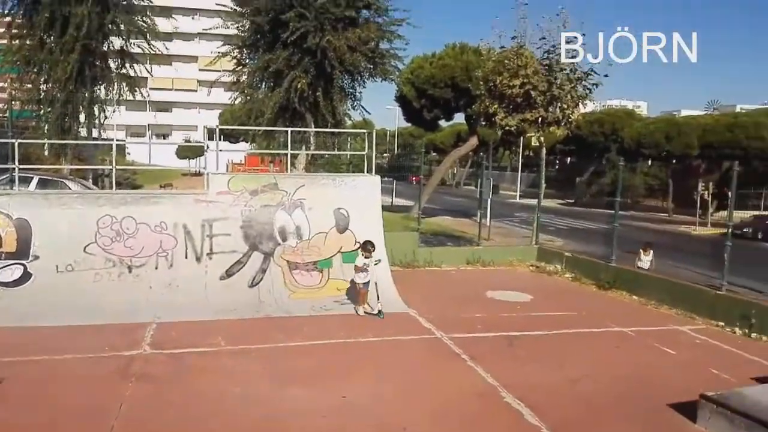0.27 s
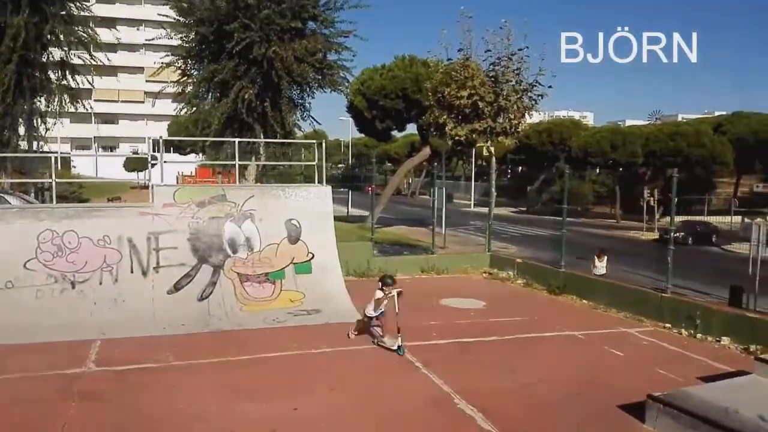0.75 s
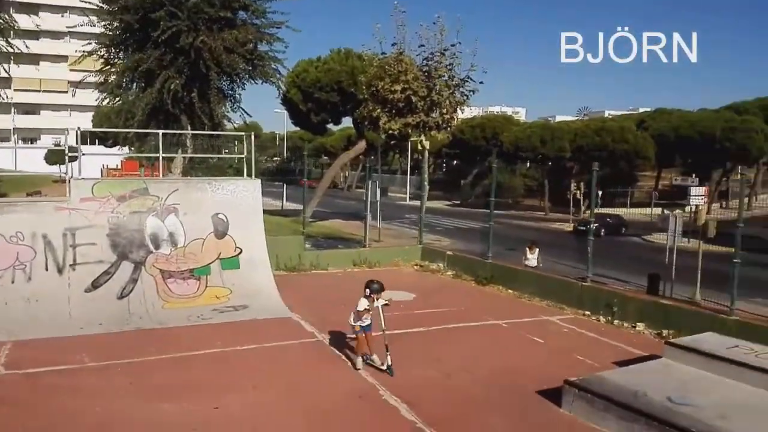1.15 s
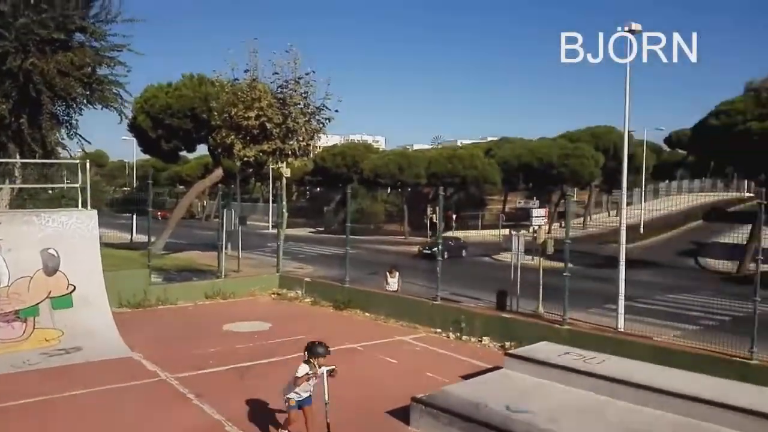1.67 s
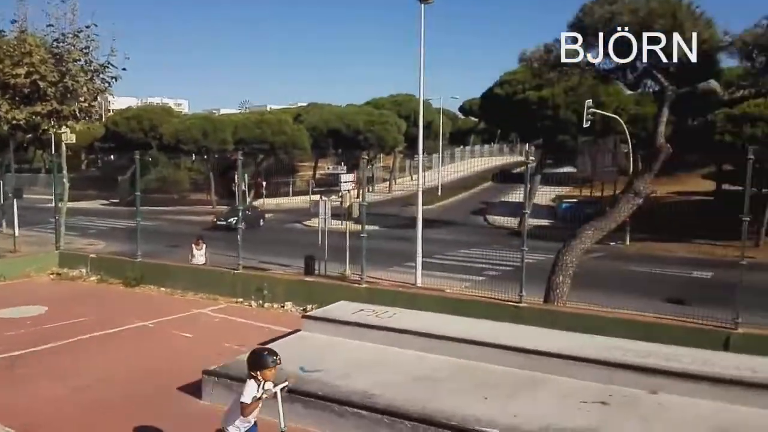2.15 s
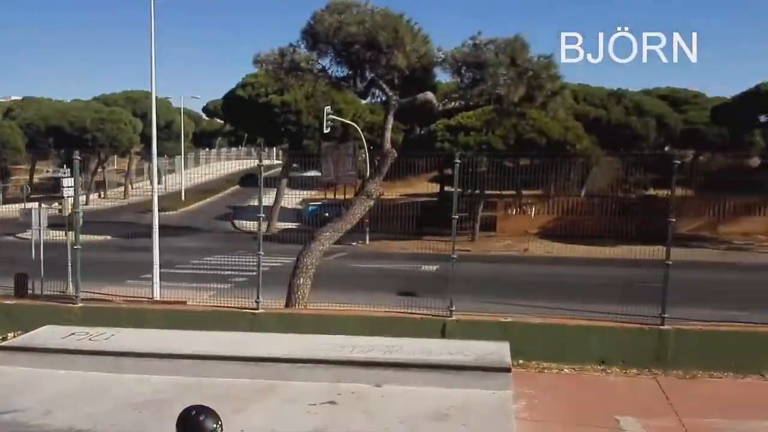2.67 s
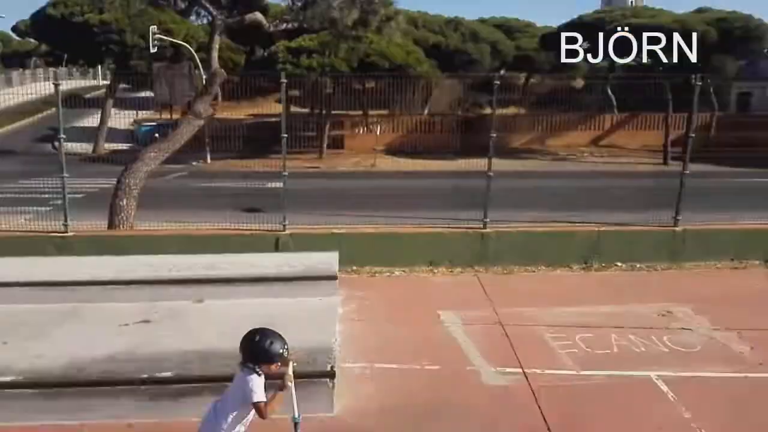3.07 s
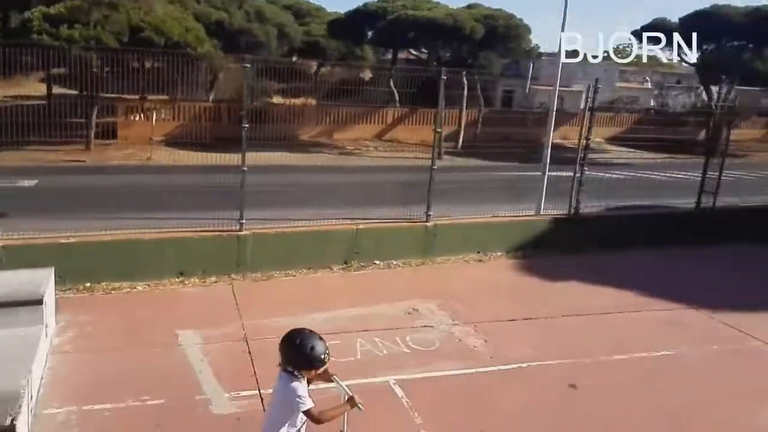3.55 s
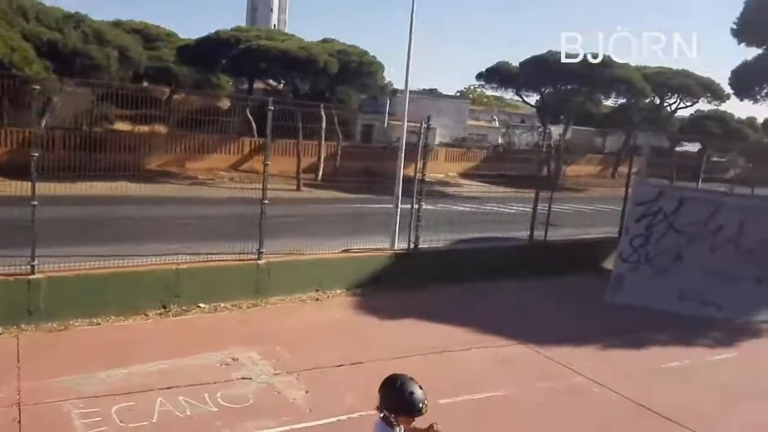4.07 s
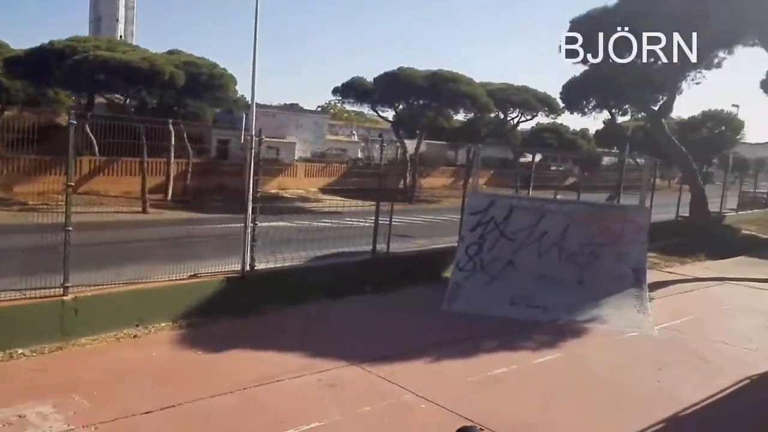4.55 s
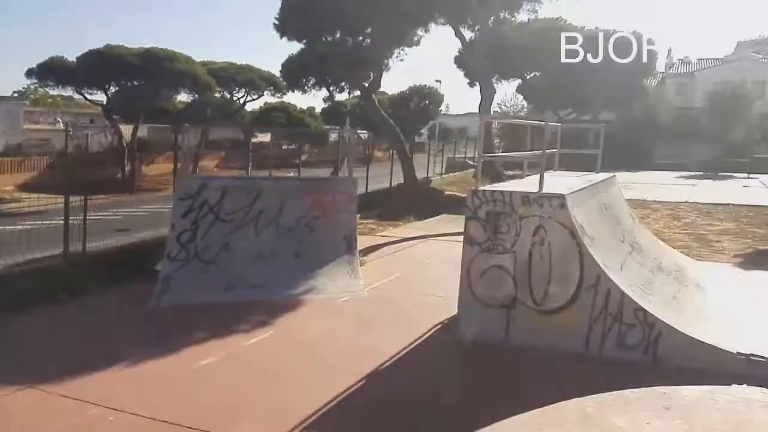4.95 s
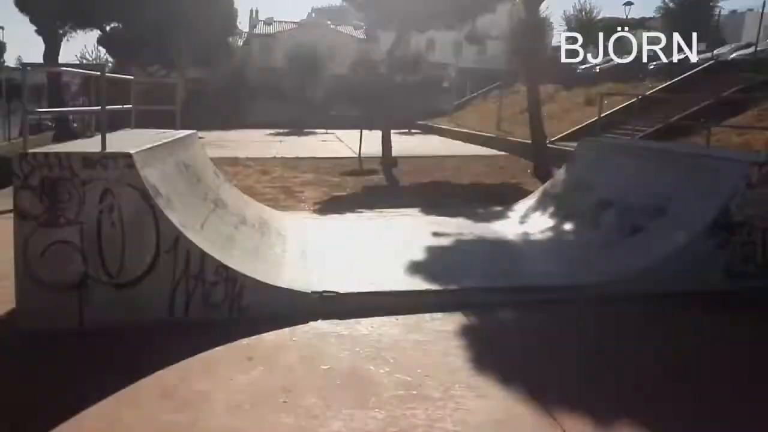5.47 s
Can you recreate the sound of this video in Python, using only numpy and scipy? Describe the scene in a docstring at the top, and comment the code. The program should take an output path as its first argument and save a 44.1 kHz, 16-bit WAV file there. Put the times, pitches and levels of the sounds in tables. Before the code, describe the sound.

A child's kick scooter crosses an outdoor skatepark. Small bright wheel ticks and two sandy shoe scrapes come first, then sharp double knocks around 1.4 seconds. Sparse clicks and faint thin whistles, perhaps a bird, follow. Near 5 seconds loud clacks burst out with hollow deck booms and a brief metallic ring. Low traffic hum and soft hiss lie beneath; a hand-held stereo phone picks up short scattered echoes.

```python
"""Scooter on a concrete court

A child's kick scooter rolls past a hand-held phone with two microphones. Short bursts of noise make the
ticking wheels and knocking metal, sandy noise makes the scraping shoe, and sagging tones with ringing
notes make the deck boom. Filtered noise gives far traffic, wind and a thin insect hiss; pure tones give
thin whistles, perhaps a bird. Scattered echoes surround the scooter, except for its ringing metal stem."""
import sys
import numpy as np
from scipy import signal
from scipy.fft import rfft, irfft
from scipy.io import wavfile
from scipy.ndimage import uniform_filter1d, map_coordinates

SR = 44100
rng = np.random.default_rng(int(sys.argv[2]) if len(sys.argv) > 2 else 0)


def invert_db(level):
    """Linear amplitude ratio for a level in decibels (20 dB per decade), elementwise."""
    return 10 ** (np.asarray(level, dtype=float) / 20)


def transcribe(u):
    """Save the signal u as a 16-bit wav file named by the first command-line argument.

    u: samples, shape (n,) or (channels, n), limited to [-1, 1]; the rate is SR.
    q: integer samples, one column per channel.
    """
    v = np.clip(np.atleast_2d(u).T, -1, 1)
    q = np.round(v * 32767).astype(np.int16)
    wavfile.write(sys.argv[1], SR, q)


N = 251370  # length in samples
T = np.arange(N) / SR  # time in seconds

# tone colour of the bright part of ticks and knocks: pitch_hz [Hz], relative_level_db [dB]
BRIGHT_COLOUR = [(2300, -3), (2900, 4.5), (4600, 5.5), (6500, 8), (8000, 1.5), (9500, -4.5), (15500, -8)]
# tone colour of the duller part of ticks and knocks: pitch_hz [Hz], relative_level_db [dB]
BODY_COLOUR = [(300, -9), (600, 8), (1200, 4.5), (2200, 1.5), (2900, -20.5), (3600, -6)]


def unit(x):
    """Scale to an rms (average strength) of 1."""
    return x / np.sqrt(np.mean(x ** 2))


def colour(x, points):
    """Filter by (Hz, dB) points; white noise keeps its overall strength."""
    hz, db = np.transpose(points)
    f = np.maximum(np.fft.rfftfreq(x.shape[-1], 1 / SR), 1)
    gain = invert_db(np.interp(np.log(f), np.log(hz), db, left=-90, right=-90))
    return irfft(rfft(x) * unit(gain), x.shape[-1])


def ring(x, modes):
    """Notes struck by x, each fading by 60 dB in its own time t60."""
    out = 0
    for hz, db, t60 in modes:
        pole = np.exp((2j * np.pi * hz - np.log(1000) / t60) / SR)
        out = out + invert_db(db) * signal.lfilter([1], [1, -pole], x).imag
    return out


def resonance(x, hz, sharp):
    """One resonance, with about unit gain for white noise."""
    return signal.lfilter(*signal.iirpeak(hz, sharp, SR), x) * np.sqrt(SR * sharp / hz / np.pi)


def walk(rate):
    """Smooth random wander with an rms of 1, from about `rate` random values per second."""
    k = int(SR / rate)
    steps = np.repeat(rng.standard_normal(N // k + 1), k)
    smooth = uniform_filter1d(uniform_filter1d(steps, k), k)
    return unit(smooth[:N])


def pair(alike):
    """Left and right noise that share the part `alike` of their power."""
    shared, left, right = rng.standard_normal((3, N))
    alike = np.clip(alike, 0, 1)
    return np.sqrt(alike) * shared + np.sqrt(1 - alike) * np.array([left, right])


def spot(alike):
    """Noise from one spot: nearly the same at both ports in the bass, only partly so in the treble."""
    noise = pair(alike)
    apart = (noise[0] - noise[1]) / 2
    bass = signal.lfilter(*signal.butter(2, 1100, fs=SR), apart)
    return noise - np.array([bass, -bass])


def grit(spread_db, rate):
    """Uneven grain sizes, a few larger than the rest, about `rate` grains per second."""
    k = int(SR / rate)
    size = np.minimum(rng.exponential(size=N // k + 1), 3)
    return unit(np.repeat(invert_db(spread_db * size), k)[:N])


def burst(db, rise, fade):
    """Swell and fade of one contact: rise is a time constant, fade the time to drop 60 dB (seconds)."""
    t = T[:SR // 4]
    return invert_db(db) * (1 - np.exp(-t / rise)) ** 2 * 1000 ** (-t / max(fade, .01))


def air():
    """Far traffic hums, drones and hisses, an insect fills a narrow band, and wind shakes each port alone."""
    # background levels: time_s [s], hum_db [dB], engine_drone_db [dB], hiss_db [dB]
    background = [(0, -46, -60, -51.5), (1.2, -46.5, -45.5, -49), (3.0, -45, -73, -52),
                  (3.7, -43.5, -54, -51), (4.3, -45, -44, -53), (5.1, -44.5, -51.5, -49),
                  (5.7, -44, -90, -52)]
    # tone colours of hum and hiss: pitch_hz [Hz], relative_level_db [dB]
    hum_colour = [(18, -51), (30, -21.5), (56, -11.5), (81, -5.5), (272, -18), (600, -30.5), (780, -55)]
    hiss_colour = [(180, 2.5), (300, 0.5), (1020, -3), (1270, -7.5), (2260, -8), (2950, -14.5), (6980, -19),
                   (7840, -28), (14500, -29.5), (15700, -46)]
    # gusts, before the wander and the softer left side: time_s [s], level_db [dB]
    gusts = [(2.2, -74), (3.1, -38.5), (4.2, -38), (4.8, -69)]

    s, hum_db, drone_db, hiss_db = np.transpose(background)
    hum = colour(pair(0.86), hum_colour) * invert_db(np.interp(T, s, hum_db) + 1.32 * walk(13))
    drone = colour(pair(1.0), [(105, -50), (121, 1), (138, -9)]) * invert_db(np.interp(T, s, drone_db))

    side_db = [[-11], [0]]  # wind is weaker on the left
    gust_db = np.interp(T, *np.transpose(gusts)) + 3.6 * walk(7.2) + side_db
    wind = colour(pair(0), [(30, -26), (75, 8), (130, -3)]) * invert_db(gust_db)

    # left and right differ more as the pitch rises, so the hiss sounds wider there
    middle, side = colour(rng.standard_normal((2, N)), hiss_colour)
    side = signal.lfilter(*signal.butter(2, 900, "high", fs=SR), side)
    hiss = np.array([middle + side, middle - side]) * invert_db(np.interp(T, s, hiss_db) + walk(15))

    insect_db = -71.5 + 1.5 * walk(8.2)  # flickers by 1.5 dB rms
    insect = colour(pair(0.15), [(6950, -47), (7170, -2), (7400, -7)]) * invert_db(insect_db)
    return hum + drone + wind + hiss + insect


def ticks():
    """Wheels tick over joints and grit: short gritty clicks with a bright and a duller part."""
    # clicks, before the overall gains: start_s [s], treble_db [dB], body_over_treble_db [dB]
    clicks = [(0.164, -26.5, -6), (0.6705, -25.5, -14), (0.744, -30, -22), (0.7856, -23.5, -5.5),
              (0.8814, -24, -25), (0.967, -45, -4), (1.3881, -26.5, -8), (1.4964, -26.5, -3),
              (1.7882, -27, -2.5), (1.845, -34.5, 1), (2.122, -38.5, 3), (2.276, -29.5, -1),
              (2.3635, -31, -17), (2.4747, -26, -17), (2.585, -27.5, -23), (2.695, -27, -5),
              (3.061, -31.5, 3), (3.115, -27, -22), (3.142, -30, -3.5), (3.2667, -37, 6),
              (3.4615, -30.5, 1.5), (3.546, -26, -7.5), (3.938, -32, -7), (3.978, -35, -4),
              (4.59, -27.5, -26), (4.701, -26, -19), (5.1977, -23.5, -28), (5.2786, -19.5, -19),
              (5.677, -30.5, -9)]
    treble, body = np.zeros((2, N + SR))
    for s, db, body_db in clicks:
        i = int(s * SR)
        treble[i:i + SR // 4] += burst(db, 0.00092, 0.084)
        body[i:i + SR // 4] += burst(db + body_db, 0.0029, 0.026)
    rattle = spot(0.23) * grit(0.56, 1500)
    bright = invert_db(-18.5) * colour(treble[:N] * rattle, BRIGHT_COLOUR)
    dull = invert_db(4) * colour(body[:N] * rattle, BODY_COLOUR)
    return bright + dull


def knocks():
    """Deck and frame blows: each is a short rattle, and where it lands decides which low notes speak."""
    # blows, before the overall gains:
    # start_s [s], treble_db [dB], body_over_treble_db [dB], low_note_under_blow_hz [Hz], fade_s [s]
    blows = [(0.2147, -29.5, -1.5, 2210, 0.066), (0.8042, -25.5, -7, 1230, 0.055),
             (1.3423, -12.5, -17.5, 1642, 0.025), (1.4472, -16.5, -10.5, 1140, 0.063),
             (1.457, -15, -10.5, 2240, 0.034), (2.764, -31, -15.5, 2420, 0.11),
             (3.0685, -22, -26, 840, 0.06), (3.701, -20, -0.5, 2080, 0.041), (3.747, -29, -7, 1770, 0.15),
             (4.7108, -20.5, -3, 1830, 0.042), (4.7304, -29.5, -3.5, 1620, 0.052),
             (4.778, -17.5, -6.5, 1000, 0.051), (4.8005, -21.5, -12, 1720, 0.044),
             (4.852, -20.5, -4.5, 1470, 0.096), (4.9092, -26, -5, 1320, 0.11),
             (4.9249, -3, -7.5, 1280, 0.039), (4.934, -5, -8, 1900, 0.064), (5.003, -25, -3, 1335, 0.082),
             (5.0353, -28.5, -8.5, 790, 0.076), (5.089, -23, -3.5, 735, 0.059),
             (5.1202, -18.5, -0.5, 970, 0.035), (5.148, -34.5, 10.5, 1366, 0.018),
             (5.3354, -5, -15.5, 830, 0.051), (5.339, -4, -11.5, 2350, 0.053),
             (5.394, -17, 13, 2180, 0.018), (5.41, -33.5, -31, 2200, 0.2), (5.479, 2, -7.5, 2640, 0.037),
             (5.5253, -6, -3, 970, 0.027)]
    # what deck and frame ring with: pitch_hz [Hz], sharpness [centre pitch / width]
    low_notes = [(830, 9), (1200, 10), (1550, 11), (1950, 10), (2200, 8), (2650, 12)]
    reach_oct = 0.17  # how far, in octaves, a blow reaches to low notes beside the one under it

    out, rattle = np.zeros((2, N + SR)), spot(0.9) * grit(2.36, 1500)
    for s, db, body_db, under_hz, fade in blows:
        i = int(s * SR)
        piece = rattle[:, i // 2:i // 2 + SR // 4]  # a different stretch of rattle as time goes on
        contact = burst(db, 0.0035, fade) * piece
        contact[:, int(.0042 * SR)] += invert_db(db + 6.5)  # one extra sharp contact
        low = 0
        for hz, sharp in low_notes:
            nearness = np.exp(-(np.log2(hz / under_hz) / reach_oct) ** 2)
            low = low + nearness * resonance(contact, hz, sharp)
        bright = invert_db(-5.5) * colour(contact, BRIGHT_COLOUR)
        dull = invert_db(-3) * colour(contact, BODY_COLOUR) + invert_db(3) * low
        out[:, i:i + SR // 4] += bright + invert_db(body_db) * dull
    return out[:, :N]


def scrapes():
    """A sole on sandy concrete lands, drags with hard bites, lifts and trails off in dense, patchy grains."""
    # pushes of the shoe, before bites and gains:
    # full_contact_s [s], drag_s [s], level_db [dB], duller_part_over_it_db [dB]
    pushes = [(0.266, 0.13, -38, 1.5), (1.004, 0.11, -34.5, 1), (3.686, 0.028, -45, -5)]
    # moments when the sole bites harder: time_s [s], lift_db [dB]
    bites = [(.279, 6), (.301, 7), (.36, 5), (.418, 2), (1.012, 3), (1.06, 5), (1.135, 3.5)]
    # borders of the bands whose grain swells alone: pitch_hz [Hz]
    band_borders = [1200, 2000, 3300, 5000, 7500, 11000]
    # tone colours of the brighter and the duller part: pitch_hz [Hz], relative_level_db [dB]
    grain_colour = [(2600, -4), (3600, 8.5), (4700, 8), (6500, 4), (8000, -5), (9500, -15), (15500, -10.5)]
    sole_colour = [(300, -11.5), (850, -16), (1500, -7.5), (2100, -5), (2900, -6), (3300, -56)]
    bite_s = .014  # half-width of one bite
    land_db_per_s, lift_db, lift_s = 449, -4.5, 0.078
    trail_db_per_s, trail_s = 59, 0.14

    treble, body = np.zeros((2, N))
    bite_db = sum(db * np.exp(-((T - s) / bite_s) ** 2) for s, db in bites)
    for s, drag, db, body_db in pushes:
        before = np.maximum(s - T, 0)
        after = np.maximum(T - s - drag, 0)
        off_db = lift_db * np.minimum(after / lift_s, 1) - trail_db_per_s * after
        off_db -= land_db_per_s * np.maximum(after - trail_s, 0)  # the trail ends steeply
        level = invert_db(db + bite_db + off_db - land_db_per_s * before)
        treble += level
        body += level * invert_db(body_db)

    rest = spot(.65) * grit(2.8, 1000) * invert_db(walk(150))
    sand = 0
    for hz in band_borders + [SR * .45]:
        # split off the lowest band that is left and let it swell by itself
        band = signal.sosfilt(signal.butter(2, hz, fs=SR, output="sos"), rest)
        sand = sand + band * invert_db(walk(120))
        rest = rest - band
    return invert_db(0.5) * colour(treble * sand, grain_colour) + colour(body * sand, sole_colour)


def booms():
    """The flexed deck thumps on a pitch that sags as it relaxes, while hollow notes ring."""
    # deck booms, two faint ones under ticks and three under loud knocks, before gains:
    # start_s [s], level_db [dB], base_pitch_hz [Hz] (the thump sags from 0.949 towards 0.545 of it)
    deck_booms = [(0.782, -36.5, 196), (2.278, -40.5, 248), (4.936, -32, 315), (5.334, -18, 317),
                  (5.48, -16, 281.5)]
    # hollow notes of the deck: pitch_hz [Hz], relative_level_db [dB], time_to_fade_60_db_s [s]
    deck_notes = [(341, -13, 0.36), (146.7, -4, 0.21), (184.8, -9.5, 0.34), (95, -15, 0.44)]
    thump, blow = np.zeros((2, N + SR))
    t = T[:SR // 4]
    for s, db, hz in deck_booms:
        i = int(s * SR)
        sagging_hz = hz * (0.545 + 0.404 * np.exp(-t / 0.0254))
        tone = np.sin(2 * np.pi * np.cumsum(sagging_hz) / SR)
        thump[i:i + len(t)] += burst(db, 0.0038, 0.11) * tone
        blow[i + int(.004 * SR)] = invert_db(db)  # the hollow notes start 4 ms later
    return invert_db(6.0) * thump[:N] + ring(blow[:N], deck_notes)


def whistles():
    """Thin whistles, mostly gliding, perhaps a bird; they flutter in level and a little in pitch."""
    # notes, before flutter and waver; the first is a faint, nearly steady tone:
    # start_s [s], length_s [s], first_pitch_hz [Hz], last_pitch_hz [Hz], level_db [dB rms at the peak]
    notes = [(1.92, .14, 1950, 2010, -66), (2.932, .075, 4100, 3790, -60.5), (3.12, .48, 2280, 2660, -62),
             (3.595, .08, 5900, 4750, -61), (3.84, .28, 3450, 3190, -64), (4.2, .31, 6700, 3960, -60)]
    glide_bend = 3  # most of the pitch change comes early
    peak_at = .3  # share of the note at which it is loudest
    out, waver = np.zeros(N), 1 + .012 * walk(300)
    for s, length, first_hz, last_hz, db in notes:
        u = np.clip((T - s) / length, 0, 1)  # 0 at the start of the note, 1 at its end
        hz = last_hz + (first_hz - last_hz) * (1 - u) ** glide_bend
        swell = np.interp(u, [0, peak_at, 1], [0, 1, 0]) ** 0.69
        out += invert_db(db) * swell * np.sin(2 * np.pi * np.cumsum(hz * waver) / SR)
    side_db = [[0], [-4]]  # softer on the right
    return np.sqrt(2) * out * invert_db(3.5 * walk(70) + side_db)


def stem():
    """Some blows, hard and soft, set the metal stem ringing on a close pair of high notes."""
    # when the stem is set ringing: time_s [s], level_db [dB]
    strikes = [(4.937, -15.5), (5.007, -29), (5.039, -37), (5.484, -14), (5.527, -20)]
    # notes of the stem: pitch_hz [Hz], relative_level_db [dB], time_to_fade_60_db_s [s]
    stem_notes = [(4715, -5, 0.085), (4625, -4, 0.04)]
    strike = np.zeros(N)
    for s, db in strikes:
        strike[int(s * SR)] = invert_db(db)
    return ring(strike, stem_notes)


def court(x, t60, wet_db):
    """Scattered echoes off ramps and fence, different on each side, made from fading noise."""
    t = T[:SR // 2]
    tail = pair(0.55)[:, :len(t)] * 1000 ** (-t / t60) * np.clip(t / 0.0025, 0, 1)
    tail = signal.lfilter([1], [1, -.5], tail)  # soften the treble
    tail = tail / np.sqrt(np.sum(tail ** 2))
    return x + invert_db(wet_db) * signal.fftconvolve(x, tail, axes=1)[:, :N]


def scene():
    """The scooter's sound reaches the right microphone a little later than the left; echoes follow."""
    # where the scooter is heard: time_s [s], right_microphone_delay_ms [ms]
    bearing = [(0, 0.25), (1.2, 0.07), (1.5, 0.072), (3.7, 0.0024), (4.7, 0.075), (5.4, 0.065)]
    near = ticks() + knocks() + scrapes() + booms()
    late = np.interp(T, *np.transpose(bearing)) * SR / 1000  # in samples
    near[1] = map_coordinates(near[1], [np.arange(N) - late], order=3, mode="nearest")
    return court(near, 0.24, -9) + stem() + whistles() + air()


def band_limit(x):
    """A steep low-pass at the top of the band."""
    return signal.sosfilt(signal.butter(12, 15870, fs=SR, output="sos"), x)


def record(dry):
    """The phone cuts the deepest bass, each port lifts its own band, peaks are clipped, the top is cut."""
    # port resonances, left then right: pitch_hz [Hz], width_hz [Hz], lift_db [dB]
    port_lifts = [(4480, 790, 8.5), (7910, 2450, 10)]
    top_hz, ceiling = 15800, .8  # ceiling: share of full scale
    dry = signal.sosfilt(signal.butter(2, 45, "high", fs=SR, output="sos"), dry)
    lifted = []
    for x, (hz, width, db) in zip(dry, port_lifts):
        band = signal.lfilter(*signal.iirpeak(hz, hz / width, SR), x)
        lifted.append(x + (invert_db(db) - 1) * band)
    clipped = np.clip(lifted, -ceiling, ceiling)
    top_cut = signal.ellip(8, .2, 60, top_hz, fs=SR, output="sos")
    finished = signal.sosfilt(top_cut, clipped)
    return band_limit(finished)


dry = scene()
out = record(dry)
transcribe(out)
```